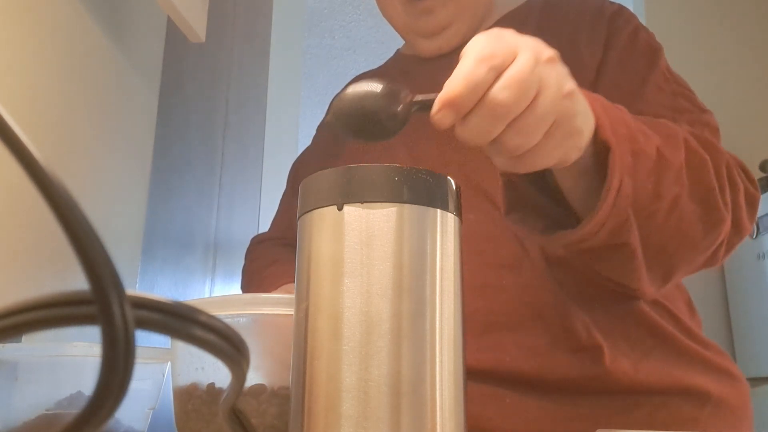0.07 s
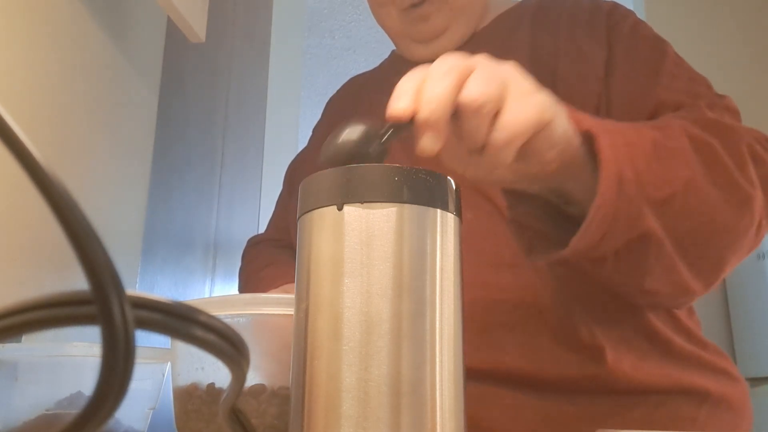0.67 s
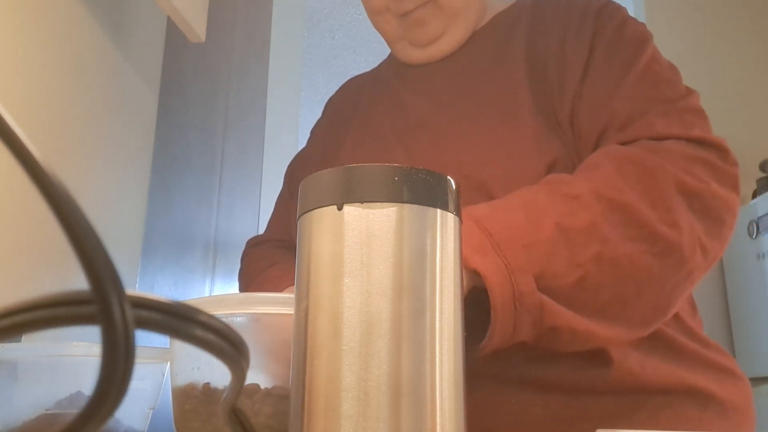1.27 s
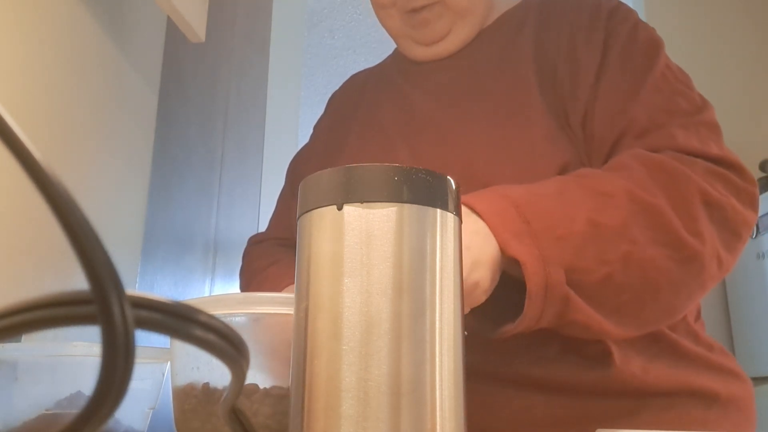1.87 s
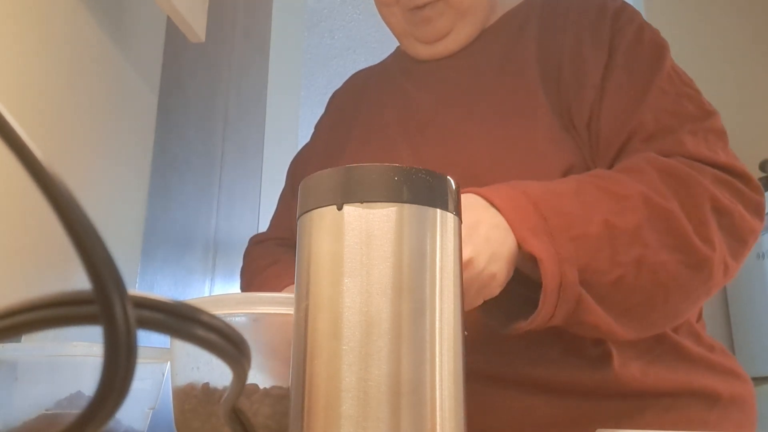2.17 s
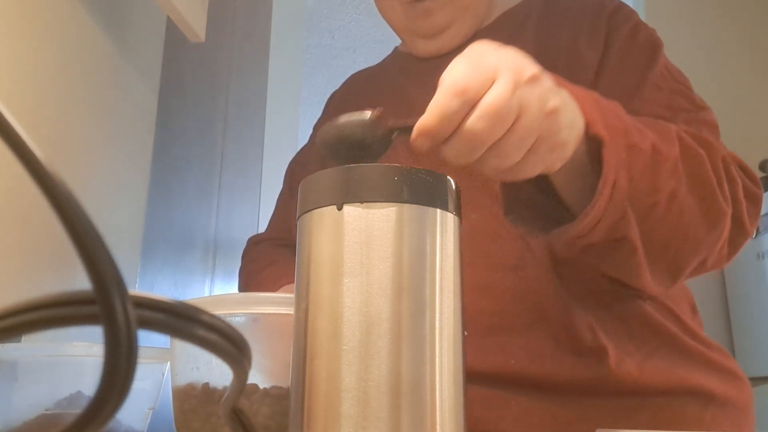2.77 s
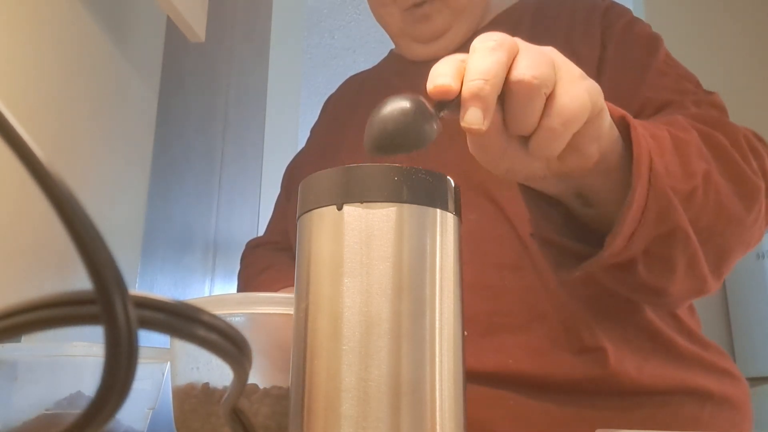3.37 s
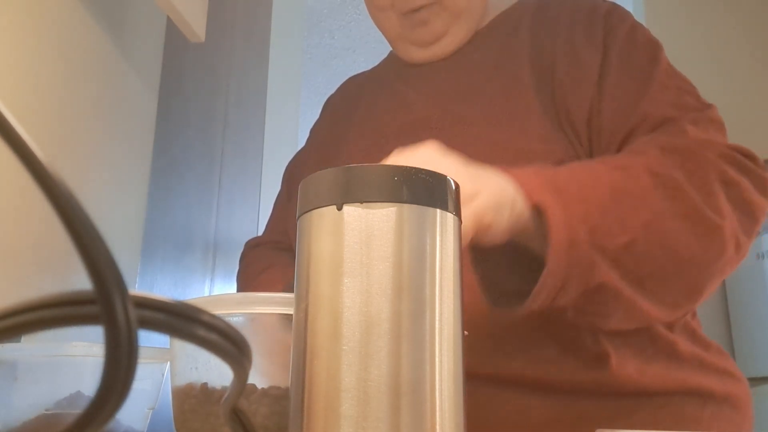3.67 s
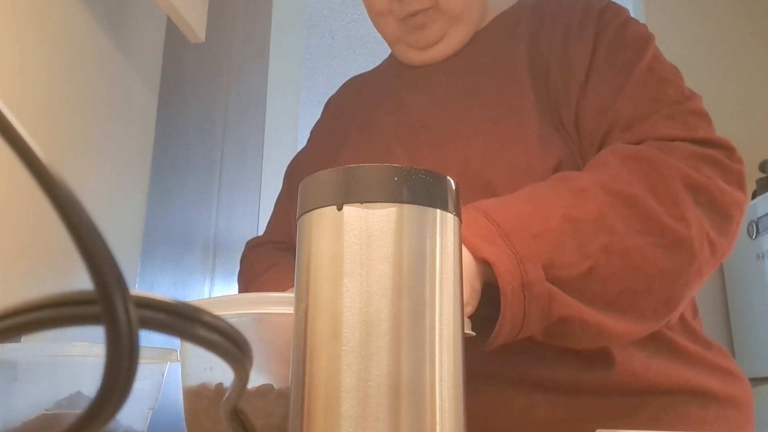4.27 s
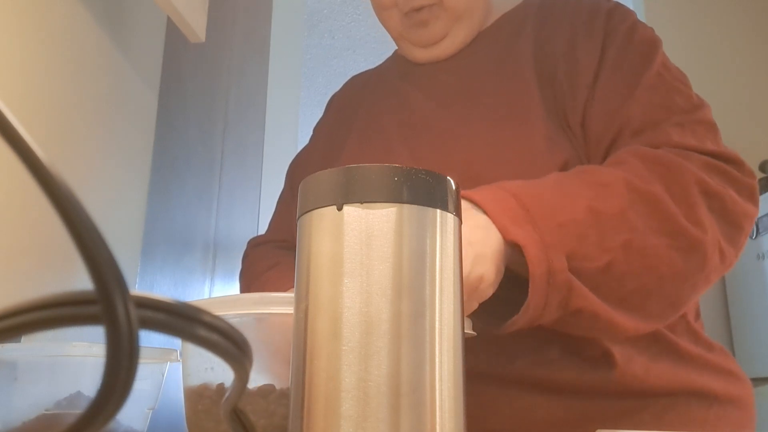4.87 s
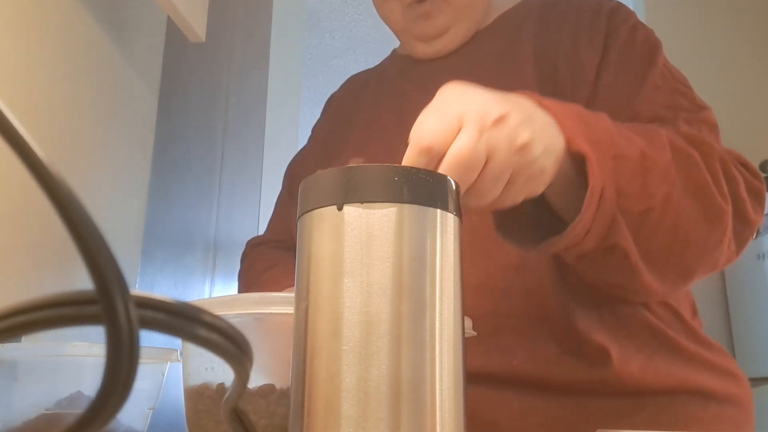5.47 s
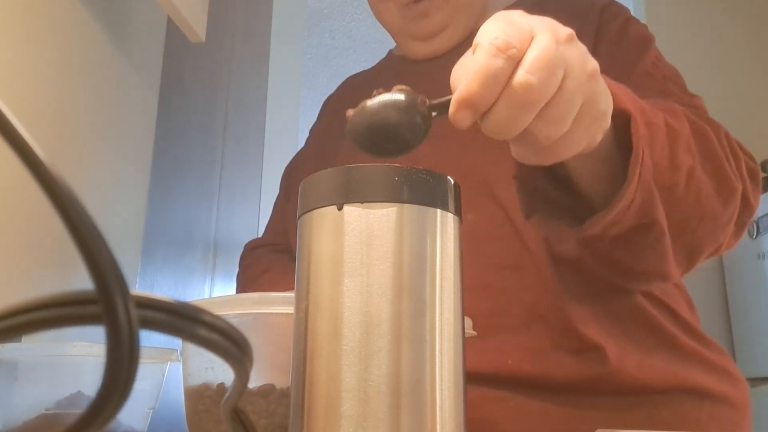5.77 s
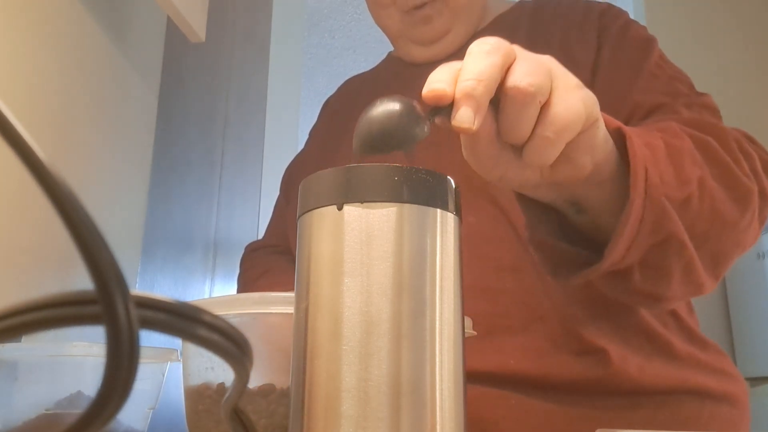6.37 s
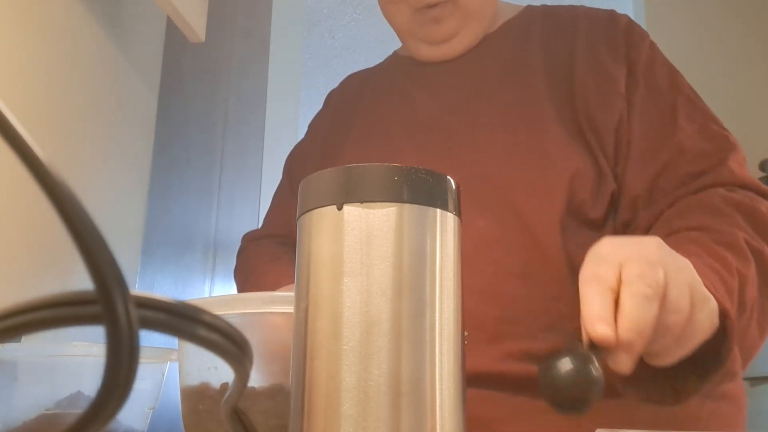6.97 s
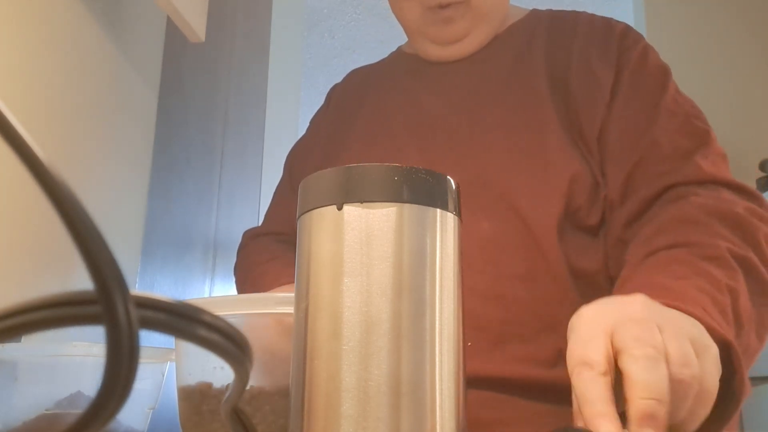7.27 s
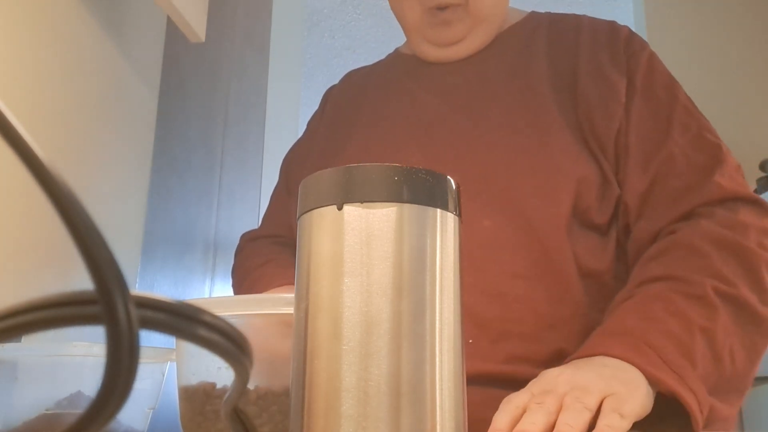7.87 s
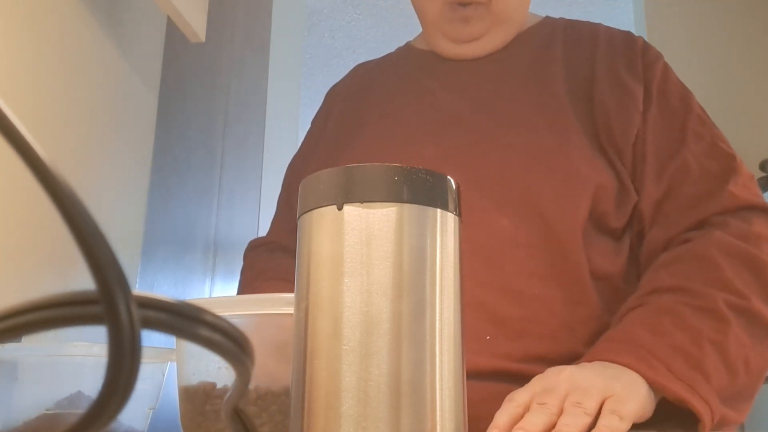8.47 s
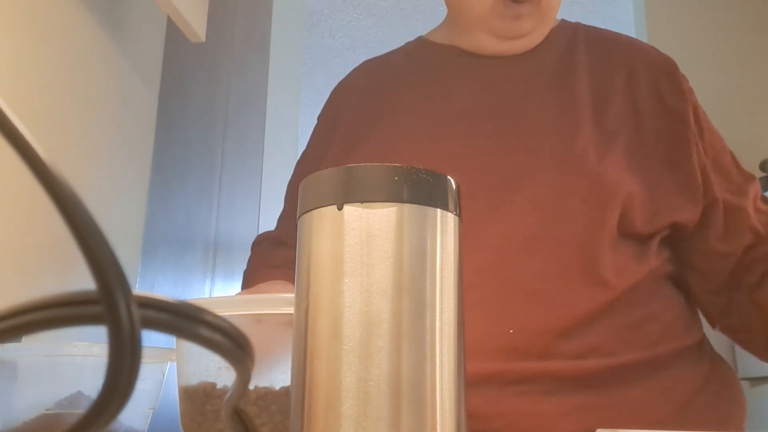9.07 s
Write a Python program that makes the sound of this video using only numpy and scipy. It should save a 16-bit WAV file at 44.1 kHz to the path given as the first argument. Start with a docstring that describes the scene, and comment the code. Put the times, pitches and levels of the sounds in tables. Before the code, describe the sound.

Close up in a kitchen, over a low fridge hum, a spoonful of coffee beans rattles into a metal canister. A plastic scoop digs crunchily in a tub of beans and pours in a second load, then digs again and pours a third. Near the end the scoop is dropped on the counter with a sharp, bouncing clack, followed by quiet rubbing and light finger taps.

```python
"""Roasted coffee beans patter into a steel canister; twice more a scoop digs them out of a plastic tub
and tips them in. The scoop then clatters onto the kitchen counter and a hand sweeps over the top.
Impacts, singly or in swarms of tiny contacts, excite the resonances of the body they strike, and the
room adds a short reverberation. A fridge hums behind it all; two microphones stand close by."""
import sys
import numpy as np
from scipy import signal
from scipy.fft import rfft, irfft, next_fast_len
from scipy.io import wavfile
from scipy.ndimage import uniform_filter1d

SR = 44100
rng = np.random.default_rng(int(sys.argv[2]) if len(sys.argv) > 2 else 0)


def wav_record(signal):
    """Record a signal, one row per channel, as 16-bit PCM in the file named by sys.argv[1]."""
    frames = np.transpose(np.atleast_2d(signal))
    bounded = np.clip(frames, -1, 1)
    # unit amplitude maps onto the largest positive 16-bit level
    quanta = np.round(bounded * 32767).astype(np.int16)
    wavfile.write(sys.argv[1], SR, quanta)


N = 402191
SIZE = 16384  # samples in an impulse response
TIME = np.arange(N) / SR
FREQ = np.maximum(np.arange(SIZE // 2 + 1) * SR / SIZE, 1)


# effort of the scoop, one curve per dig: t/s, level/dB
DIG_EFFORT = [
    [(0.935, -66), (0.947, -38.5), (0.979, -34), (1.043, -34), (1.107, -27), (1.129, -38), (1.185, -26),
     (1.357, -34), (1.373, -31.5), (1.403, -36.5), (1.645, -35), (1.653, -31), (1.851, -37), (1.94, -94)],
    [(3.825, -81), (3.837, -37), (3.853, -29.5), (3.909, -25.5), (3.959, -41.5), (4.023, -29.5),
     (4.133, -39), (4.149, -31.5), (4.357, -37), (4.371, -45), (4.541, -33.5), (4.809, -40.5),
     (4.829, -53.5), (4.96, -56)],
]
# scoop and jammed beans striking the tub: t/s, level/dB, treble re level/dB
TUB_IMPACTS = [(0.872, -35.5, 7.5), (1.078, -12, -18), (1.102, -26.5, 0), (1.179, -12.5, -9),
               (1.193, -22.5, -20), (1.287, -14, -5.5), (1.372, -20, -12), (1.843, -29, -25),
               (3.692, -41, -2.5), (3.838, -42.5, 13), (3.875, -12, -15.5), (3.898, -11.5, -11),
               (4.118, -22, -5.5), (4.152, -17, -39), (4.165, -15.5, -16), (4.545, -24, -25),
               (4.697, -19, -14), (4.735, -16, -9.5), (4.787, -20.5, -5.5), (4.804, -34, 4),
               (4.849, -27, -6.5)]
# spectral envelope of the tub: f/Hz, level/dB
TUB_ENVELOPE = [(60, -13.5), (130, -6.5), (250, -12.5), (380, -6), (650, 1.5), (1100, 5), (1380, -3),
                (2300, -7.5), (4000, -5), (7500, -12.5), (10000, -12.5), (13000, -8.5), (16000, -18.5)]
# its resonances and notches: f/Hz, width/Hz, gain/dB
TUB_RESONANCES = [(243, 61, 12.5), (680, 110, 6), (1178, 61, 9), (1288, 123, -16.5), (1717, 230, 5.5),
                  (2280, 720, 10.5), (2960, 570, -1)]

def tub(usual_db=-35, bright_db_per_db=0.06, plunge_bass_db=6.5, lift_s=0.16,
        hollow_hz=850, hollow_q=1.5, hollow_db=-5):
    """Granular friction: beans jam and snap free against the tub; the rising scoop's cavity resonates."""
    drive, depth, clear = np.zeros((3, N)), np.zeros(N), np.zeros(N)
    for dig in DIG_EFFORT:
        times, levels = np.transpose(dig)
        effort = np.interp(TIME, times, levels)
        treble = effort + bright_db_per_db * (effort - usual_db)  # a harder push crunches brighter
        digging = (TIME >= times[0]) & (TIME <= times[-1])
        drive += digging * amp([effort, effort, treble])
        depth += digging * np.exp(-np.maximum(TIME - times[0], 0) / lift_s)
        clear += digging * ((TIME - times[0]) / (times[-1] - times[0])) ** 2
    energy = swarm(drive * bands(-17, -2, -10), rate_hz=3000, spread_db=1, colour_db=7)
    energy += blows(TUB_IMPACTS, gains_db=[-18, -4, -3])
    energy[0] *= amp(plunge_bass_db * depth) ** 2  # the scoop thuds while it is deep
    plastic = response(TUB_ENVELOPE, TUB_RESONANCES, ripple_db=6.5)
    crunch = radiate(energy, plastic, crack_t60=0.018, near_db=1, near_t60=0.062,
                     room_db=-4.5, pan_db=-1.2, lag_s=-0.0005)
    hollow = signal.lfilter(*signal.iirpeak(hollow_hz, hollow_q, fs=SR), crunch)
    return crunch + amp(hollow_db) * clear * hollow


# beans sliding in the canister:
# t/s, rise/s, length/s, level/dB, thinning/(dB/s), bass re level/dB, treble re level/dB
BEAN_SLIDES = [ (0.156, 0.017, 0.065, -61.5, 61, -4.5, 4.5), (0.254, 0.08, 0.185, -30, 150, -13, 6),
               (3.066, 0.066, 0.27, -31, 166, -13.5, 5), (5.925, 0.015, 0.31, -41.5, 33, -1.5, 2),
               (6.09, 0.0048, 0.099, -57, 84, -26, 3), (6.924, 0.051, 0.21, -43, 11, 2, 2), ]
# clumps and stray beans landing: t/s, level/dB, treble re level/dB
CANISTER_IMPACTS = [(.316, -31.5, 22.5), (.328, -17.5, 9), (.39, -23, 0), (.44, -33, 11),
                    (3.06, -41.5, 9.5), (3.089, -37, 17), (3.131, -25, -2), (3.197, -20.5, -8),
                    (3.425, -46, 4), (5.905, -45, 11.5), (5.95, -20.5, -1.5), (6.096, -24.5, 0.5),
                    (6.12, -29.5, 7), (6.155, -39.5, 14), (6.183, -41, 10), (6.293, -51, 11),
                    (6.941, -46, 11), (6.984, -26, -4)]
# spectral envelope of the canister: f/Hz, level/dB
CANISTER_ENVELOPE = [(60, -13.5), (125, 3.5), (300, -15), (800, -2.5), (1600, -2), (3500, -3.5), (6000, -3),
                     (8500, -2.5), (11000, 4.5), (13500, 7.5), (16000, -2.5)]
# its resonances: f/Hz, width/Hz, gain/dB
CANISTER_RESONANCES = [(121, 10, 1.7), (420, 99, 14), (1107, 66, 8.9), (1684, 150, 11), (2270, 220, 2.3),
                       (2610, 610, 5.7), (3480, 170, 4.1), (4160, 450, 1.4), (5440, 360, 6),
                       (5900, 940, 1.9), (12200, 250, 3.6)]

def canister():
    """Random impact excitation: beans patter inside the steel tube; later the heap shifts once more."""
    drive = sum(amp(level) * bands(bass, 0, treble) * flow(TIME - start, rise, length, thinning)
                for start, rise, length, level, thinning, bass, treble in BEAN_SLIDES)
    energy = swarm(drive, rate_hz=1900, spread_db=-1, colour_db=5)
    energy += blows(CANISTER_IMPACTS, gains_db=[-14, 0.3, 0.3])
    steel = response(CANISTER_ENVELOPE, CANISTER_RESONANCES, ripple_db=3.5, ripple_hz=110)
    return radiate(energy, steel, crack_t60=0.054, near_db=-24.5, near_t60=0.055,
                   room_db=-8, pan_db=-1.1, lag_s=0.0005)


def flow(t, rise, length, thinning, stop_t60=0.13):
    """Granular flow t seconds into a pour: quadratic growth, exponential thinning, then a quick stop."""
    db = -thinning * np.maximum(t - rise, 0) - 60 * np.maximum(t - length, 0) / stop_t60
    return np.clip(t / rise, 0, 1) ** 2 * amp(db)


# the clearest beans ringing on bare steel: t/s, f/Hz, level/dB
CLEAR_CLINKS = [(0.389, 5420, -26), (3.119, 4400, -33), (3.156, 5500, -25), (3.195, 5340, -32),
                (6.096, 3500, -31), (6.1, 4140, -29), (6.11, 4300, -35), (6.12, 3750, -30.5),
                (6.211, 4060, -40)]

def clinks(per_slide=26, low_hz=2500, high_hz=6500, spread_db=3, t60=0.055):
    """Free vibration: single beans hit bare steel, each at a pitch set by its size and landing spot."""
    tones = [(start, hz, db, t60) for start, hz, db in CLEAR_CLINKS]
    for start, rise, length, level, thinning, _, _ in BEAN_SLIDES:
        for when, pitch, force in rng.random((per_slide, 3)):
            t = when * length
            flow_db = 20 * np.log10(flow(t, rise, length, thinning) + 1e-9)
            db = level + flow_db + spread_db * (2 * force - 1)
            tones.append((start + t, low_hz * (high_hz / low_hz) ** pitch, db, t60))
    return pings(tones)


def boom(start=0.318, length=0.058, hz=122, db=-34):
    """A low mode of the canister sounds briefly as the first load lands on the bare bottom."""
    along = np.clip((TIME - start) / length, 0, 1)
    return amp(db) * np.sin(np.pi * along) * np.sin(2 * np.pi * hz * TIME)


# scoop against the canister's collar: t/s, level/dB, treble re level/dB
COLLAR_IMPACTS = [(5.95, -28, -27), (5.992, -26.5, -30)]
# spectral envelope of the collar: f/Hz, level/dB
COLLAR_ENVELOPE = [(90, -29), (300, -1), (600, 6.5), (900, 6), (1500, -9.5), (4000, 1), (16000, -23)]
# its resonances: f/Hz, width/Hz, gain/dB
COLLAR_RESONANCES = [(408, 89, 12), (695, 160, 2)]

def collar():
    """Damped resonance: the scoop knocks twice on the canister's plastic collar."""
    energy = blows(COLLAR_IMPACTS, gains_db=[-11, 0.3, 0.3])
    plastic = response(COLLAR_ENVELOPE, COLLAR_RESONANCES)
    return radiate(energy, plastic, crack_t60=0.02, near_db=7.5, near_t60=0.067, room_db=-5, pan_db=-1)


# scoop, then fingers, on the counter: t/s, level/dB, treble re level/dB, f/Hz where the spot rings most
COUNTER_IMPACTS = [(7.23, -11, -19, 2800), (7.3466, -16, 4.5, 1050), (7.375, -3.5, -9, 2800),
                   (7.391, -16.5, -35, 2280), (7.4232, -9.5, -11, 1910), (7.435, -13.5, -22, 1620),
                   (7.442, -17.5, -24, 1510), (7.623, -29, -15.5, 2280), (8.096, -27.5, -15, 1400),
                   (8.209, -23, -8, 1100), (8.295, -34.5, -20, 700), (8.564, -26.5, -12, 900)]
# spectral envelope of the scoop on the counter: f/Hz, level/dB
SCOOP_ENVELOPE = [(100, -44.5), (220, -2), (320, -14.5), (500, -4), (750, -7.5), (1200, -13), (1800, -1),
                  (2500, -1.5), (3300, -5.5), (4200, -8.5), (7000, -9.5), (9500, -7.5), (16000, -17.5)]
# resonances of the counter: f/Hz, width/Hz, gain/dB
COUNTER_RESONANCES = [(505, 39, 1.7), (1132, 230, 19.6), (1520, 70, 3), (2130, 210, 4.3), (2440, 210, 6.7),
                      (3006, 57, 2.1), (9300, 740, 2.6)]

def scoop():
    """Impulse excitation: the plastic scoop touches the counter, drops and bounces; fingers tap after."""
    energy = blows(COUNTER_IMPACTS, gains_db=[-17, 1.2, 1.2])
    body = response(SCOOP_ENVELOPE, COUNTER_RESONANCES, ripple_db=5)
    return radiate(energy, body, crack_t60=0.044, near_db=-5.5, near_t60=0.12, room_db=-11, pan_db=-0.5)


# lightly damped modes of the scoop and things on the counter: f/Hz, level re impact/dB
RINGING_MODES = [(640, -19), (1113, -20), (1410, -16.5), (1535, -16.5), (1669, -15), (1830, -17),
                 (2014, -7.5), (2223, -15.5), (2449, -16), (2780, -16), (3160, -11)]

def after_ring(t60_cycles=230, fall_db_per_octave=13.5):
    """Modal decay at constant Q: each clack favours the modes near the struck spot's own frequency."""
    tones = []
    for start, level, _, spot_hz in COUNTER_IMPACTS:
        for hz, db in RINGING_MODES:
            octaves_away = abs(np.log2(hz / spot_hz))
            tones.append((start, hz, level + db - fall_db_per_octave * octaves_away, t60_cycles / hz))
    return pings(tones)


# scoop and hand sliding over the counter: t/s, length/s, level/dB, treble re level/dB
STROKES = [(7.211, 0.16, -41.5, -13.5), (7.64, 0.14, -42, -6.5), (7.725, 0.25, -53, -10),
           (7.972, 0.19, -41, -7.5), (8.143, 0.12, -39.5, -8.5), (8.465, 0.2, -39.5, -10.5)]
# spectral envelope of the rubbing: f/Hz, level/dB
PALM_ENVELOPE = [(150, -10), (450, 5.5), (800, 7), (1200, -4.5), (1800, 3), (2600, 0.5), (4000, -8.5),
                 (6500, -25), (9000, -18.5), (12000, -25), (16000, -30.5)]

def palm(speed_exponent=0.98):
    """Sliding friction: dense, fine slips of skin swell and fade with the hand's speed in each stroke."""
    drive = 0
    for start, length, level, treble in STROKES:
        along = np.clip((TIME - start) / length, 0, 1)
        speed = 4 * along * (1 - along)
        drive = drive + amp(level) * bands(-15, 0, treble) * speed ** speed_exponent
    energy = swarm(drive, rate_hz=14000, spread_db=3.5, colour_db=4)
    body = response(PALM_ENVELOPE, COUNTER_RESONANCES, ripple_db=9.5)
    return radiate(energy, body, crack_t60=0.013, near_db=-1.5, near_t60=0.027,
                   room_db=-9.5, pan_db=-2.5)


def squeak(start=8.297, length=0.0314, from_hz=720, to_hz=370, db=-40, roughness=0.24):
    """Stick-slip oscillation: a fingertip slips unevenly, falling in pitch as it stops."""
    along = np.clip((TIME - start) / length, 0, 1)
    jitter = 1 + roughness * np.repeat(noise(N // 64 + 1), 64)[:N]
    phase = 2 * np.pi * np.cumsum(jitter * from_hz * (to_hz / from_hz) ** along) / SR
    return amp(db) * np.sin(np.pi * along) * np.sin(phase)


# spectral envelope of fan noise and hiss: f/Hz, level/dB
AIR_ENVELOPE = [(25, -21.5), (55, -0.5), (100, -2.5), (220, -2.5), (460, -3), (600, -9.5), (1150, -17.5),
                (1400, -29), (1900, -23.5), (2400, -40), (4500, -39.5), (8000, -34), (10500, -27.5),
                (16000, -31)]
# resonances of the fan: f/Hz, width/Hz, gain/dB
FAN_RESONANCES = [(1730, 38, 16), (3140, 50, 13.7)]
# partials of the hum: f/Hz, rms level/dB
HUM_PARTIALS = [(59.2, -57), (118.4, -65), (177.6, -66.5), (231.5, -57.5), (306.8, -66.5), (366.1, -65.5),
                (457.6, -64)]

def fridge(air_db=-55, alike_hz=900, waver=0.37):
    """A line spectrum over a continuous one: gently wavering hum above fan noise and faint hiss."""
    air = response(AIR_ENVELOPE, FAN_RESONANCES)
    air *= amp(air_db) / np.linalg.norm(irfft(air))
    air_highs = air * FREQ / (FREQ - 1j * alike_hz)  # left and right differ mainly in short waves
    mid = signal.oaconvolve(noise(N + SIZE), irfft(air), "valid")[:N]
    side = signal.oaconvolve(noise(N + SIZE), irfft(air_highs), "valid")[:N]
    knots = np.linspace(0, TIME[-1], 40)
    hum = 0
    for hz, db in HUM_PARTIALS:
        swell, drift = (np.interp(TIME, knots, waver * noise(len(knots))) for _ in range(2))
        phase = 2 * np.pi * (hz * TIME + rng.random()) + drift * hz / HUM_PARTIALS[0][0]
        hum = hum + np.sqrt(2) * amp(db) * (1 + swell) * np.sin(phase)
    return mid + hum + np.array([side, -side])


# reverberation time of the kitchen in bass, middle and treble: T60/s
REVERB_TIMES = [.35, 0.33, 0.14]

def radiate(energy, body, crack_t60, near_db, near_t60, room_db, pan_db, lag_s=0,
            bass_hz=400, treble_hz=5000):
    """Source and filter: each contact's crack, near echoes and room tail are noise shaped by the body."""
    edges = [(bass_hz, "low"), ([bass_hz, treble_hz], "band"), (treble_hz, "high")]
    out = 0
    for spikes, (hz, kind), room_t60 in zip(energy, edges, REVERB_TIMES):
        echoes = amp(near_db) ** 2 * fade(spikes, near_t60)
        tail = amp(room_db) ** 2 * fade(spikes, room_t60)
        force = noise_field(lag_s) * np.sqrt(fade(spikes, crack_t60) + echoes + tail)
        impulse = signal.sosfilt(signal.butter(4, hz, kind, fs=SR, output="sos"), irfft(body))
        impulse /= np.linalg.norm(impulse)
        out = out + signal.oaconvolve(force, impulse[None], axes=1)[:, :N]
    return out * amp([[pan_db / 2], [-pan_db / 2]])


def swarm(drive, rate_hz, spread_db, colour_db):
    """Poisson process: three-band energy of contacts of random strength and colour, fewer at low drive."""
    touch = rng.random(N) < rate_hz * np.sqrt(drive[1] / drive[1].max()) / SR
    energy = touch * amp(spread_db * rng.exponential(size=N) + colour_db * noise((3, N))) ** 2
    # the work of the hand is shared among the contacts of each moment
    energy /= np.maximum(uniform_filter1d(energy, size=1100), 1e-9)
    return energy * drive ** 2


def blows(rows, gains_db, contact_s=0.0006):
    """Impulses: each impact delivers its bass, middle and treble energy in one spike."""
    energy = np.zeros((3, N))
    for start, level, treble, *_ in rows:
        band_db = level + np.array([0, 0, treble]) + gains_db
        energy[:, int(start * SR)] += amp(band_db) ** 2 * contact_s * SR
    return energy


def response(envelope, modes, ripple_db=0, ripple_hz=45, blur_hz=8000):
    """Minimum-phase response of a body: its envelope, main resonances and a thicket of small ones."""
    hz, db = np.transpose(envelope)
    db = np.interp(np.log(FREQ), np.log(hz), db)
    db += sum(gain / (1 + (2 * (FREQ - centre) / width) ** 2) for centre, width, gain in modes)
    thicket = np.interp(FREQ / ripple_hz, np.arange(SIZE), np.tanh(noise(SIZE)))
    db += ripple_db * thicket * FREQ / (FREQ + 1200) / (1 + (FREQ / blur_hz) ** 2)
    cepstrum = irfft(np.log(amp(db)))
    cepstrum[1:SIZE // 2] *= 2  # folding the cepstrum makes the response causal
    cepstrum[SIZE // 2 + 1:] = 0
    return np.exp(rfft(cepstrum))


def pings(tones):
    """Damped sinusoids (t/s, f/Hz, level/dB, T60/s), each in its own phase at the two microphones."""
    out, t = np.zeros((2, N + SIZE)), TIME[:SIZE]
    for start, hz, db, t60 in tones:
        first = int(start * SR)
        phase = 2 * np.pi * (hz * t + rng.random((2, 1)))
        out[:, first:first + SIZE] += amp(db - 60 * t / t60) * np.sin(phase)
    return out[:, :N]


def noise_field(lag_s, direct_share=0.23, alike_hz=520):
    """Spatial coherence: direct noise arrives lag_s later on the left; long diffuse waves arrive alike."""
    shared = signal.lfilter(*signal.butter(1, alike_hz, "low", fs=SR), noise(N))
    diffuse = shared + signal.lfilter(*signal.butter(1, alike_hz, "high", fs=SR), noise((2, N)))
    wave = noise(N)
    direct = np.array([np.roll(wave, round(lag_s * SR)), wave])
    return np.sqrt(direct_share) * direct + np.sqrt(1 - direct_share) * diffuse


def fade(energy, t60):
    """Exponential decay: each spike of energy is spread out, falling 60 dB in t60 seconds."""
    keep = amp(-120 / (t60 * SR))
    return signal.lfilter([1 - keep], [1, -keep], energy + 1e-18)


def bands(bass_db, middle_db, treble_db):
    """Gains of bass, middle and treble as a column."""
    return amp([[bass_db], [middle_db], [treble_db]])


def amp(db):
    """Decibels to amplitude ratio."""
    return 10 ** (np.asarray(db) / 20)


def noise(size):
    """White noise of rms 1."""
    return rng.standard_normal(size)


def scene():
    """Superposition of all sources at the two microphones."""
    beans = tub() + canister() + boom() + clinks()
    return beans + collar() + scoop() + after_ring() + palm() + squeak() + fridge()


# sensitivity of the left microphone re the right: f/Hz, level/dB
MIC_BALANCE = [(40, -2.5), (120, 5), (260, 5.5), (380, 1), (750, 0.5), (1800, -2), (2800, 3.5), (4500, 1.5),
               (6800, -0.5), (8200, -4), (11000, -0.5), (16000, -0.5)]

def record(dry, overload=0.85, top_hz=16000):
    """Transduction: the two microphones differ in colour, clip on overload and cut the very top."""
    hz, db = np.transpose(MIC_BALANCE)
    size = next_fast_len(N + SIZE)
    freq = np.maximum(np.arange(size // 2 + 1) * SR / size, 1)
    lean_db = np.interp(np.log(freq), np.log(hz), db) / 2
    heard = irfft(rfft(dry, size) * amp([lean_db, -lean_db]), size)[:, :N]
    lowpass = signal.ellip(10, 0.2, 70, top_hz, fs=SR, output="sos")
    return signal.sosfilt(lowpass, np.clip(heard, -overload, overload))


dry = scene()
out = record(dry)
wav_record(out)
```